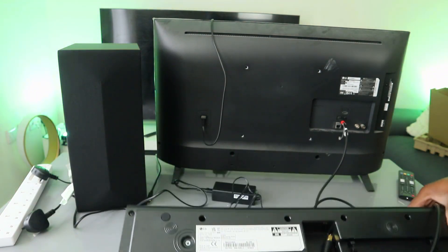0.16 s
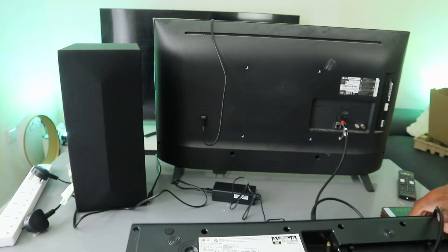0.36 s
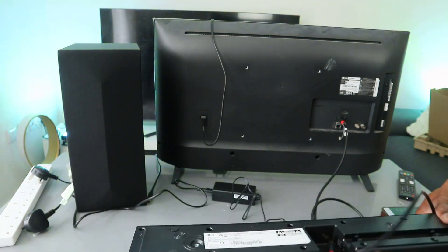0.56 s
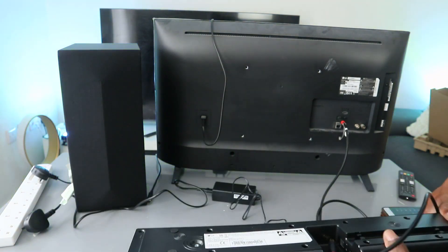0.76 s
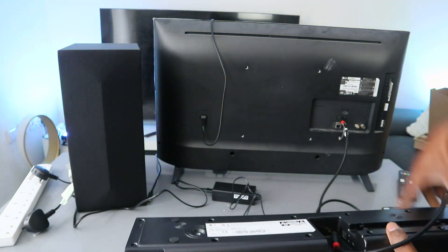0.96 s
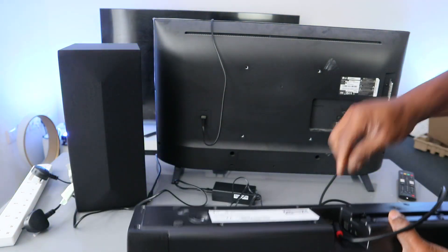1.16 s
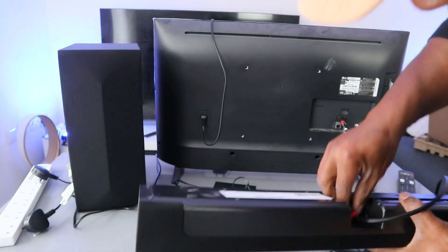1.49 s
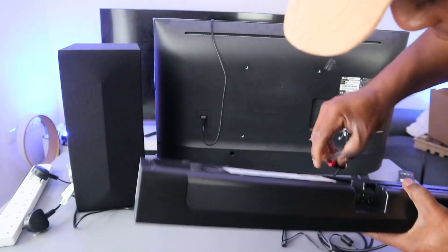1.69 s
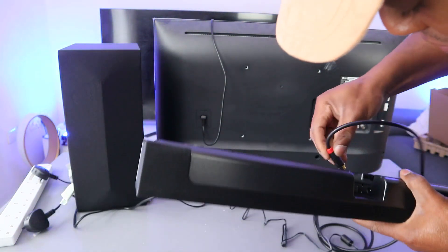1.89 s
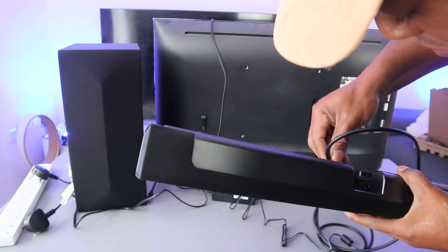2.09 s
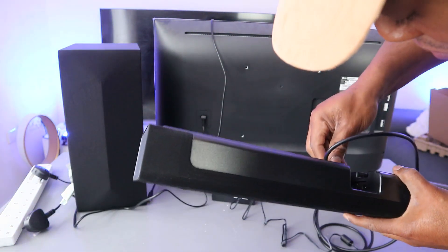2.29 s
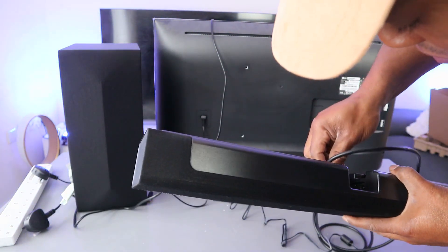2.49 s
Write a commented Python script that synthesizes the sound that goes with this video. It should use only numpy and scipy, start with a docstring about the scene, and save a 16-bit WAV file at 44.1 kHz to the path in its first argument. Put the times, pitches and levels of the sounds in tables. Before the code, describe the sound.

Plastic speaker housing knocks loudly on a desk, then clicks and scrapes as a plug is handled

```python
"""In a small room, a long plastic speaker housing is turned over on a desk while a plug is worked at its socket.
Knocks and clicks are shaped pulses, scrapes are runs of tiny slips; both excite the housing's resonances.
Each is heard as a direct snap, three echoes, panel rattle and a short room tail, with soft bumps beside them.
The first knock overloads the recorder, whose gain then creeps back up over a low hum and hiss, kept as
shaped noise."""
import sys
import numpy as np
from scipy import signal
from scipy.fft import rfft, irfft
from scipy.io import wavfile
from scipy.ndimage import uniform_filter1d

SR = 44100
rng = np.random.default_rng(int(sys.argv[2]) if len(sys.argv) > 2 else 0)


def output_pcm(signal):
    """Save a mono or channel-first signal as 16-bit PCM at the path in sys.argv[1].

    Samples are clipped to [-1, 1] before scaling.
    """
    pcm = np.clip(np.atleast_2d(signal).T, -1, 1) * 32767
    wavfile.write(sys.argv[1], SR, np.round(pcm).astype(np.int16))


N = 116865
TAIL = SR // 2   # length of every response, samples
HZ = np.maximum(np.arange(TAIL // 2 + 1) * SR / TAIL, 1)


def from_db(db):
    """Decibels to gain."""
    return 10 ** (np.asarray(db) / 20)


def at_hz(points, hz, axis=1):
    """Read a table column on a log-frequency axis."""
    table = np.array(points)
    return np.interp(np.log(hz), np.log(table[:, 0]), table[:, axis])


def add(track, s, sound):
    """Mix a sound in at a time."""
    start = max(int(s * SR), 0)
    track[..., start:start + sound.shape[-1]] += sound[..., :N - start]


def die_away(t, t60_s):
    """Exponential decay that falls 60 dB in t60."""
    return np.exp(-np.log(1000) * t / t60_s)


def pulse(db):
    """The shortest causal pulse with a given spectrum: minimum phase, by folding the cepstrum."""
    cepstrum = irfft(np.log(from_db(db)), TAIL)
    cepstrum[1:TAIL // 2] *= 2
    cepstrum[TAIL // 2 + 1:] = 0
    return irfft(np.exp(rfft(cepstrum)), TAIL)


# contacts with the housing, and a strong wall return some 25 ms after a hard knock (0.031, 1.633): [t/s, #
# relative level/dB, then colour on top of it: thud/dB, hollow/dB, crack/dB, tick/dB]
KNOCKS = [(.0035, 9.5, -5.5, 4.5, 5.5, -2.5), (.005, 15.5, -5, -7, 4.5, 0.5), (.0085, -1, 13, 5, -8, -14),
          (0.031, 10, -12, -8.5, -4, -14), (.046, 2.5, -7, -2, -10, -16), (.105, -7.5, -16, 2, -14, -20),
          (0.238, -14.5, 1, -6, 3.5, -26), (0.3708, -15, 2.5, -11, -6, -4), (.411, -20, 4.5, 1, 10.5, 9.5),
          (.428, -23.5, 9.5, 8, 8, 6), (0.499, -22.5, 11, 8.5, 6.5, -12), (0.5726, -19.5, 5.5, 0.5, -2, -9),
          (0.595, -24, 7, 3.5, 2, -5), (0.613, -22.5, -3, 1, 8, -2), (0.6317, -10, -3.5, -6.5, -5, 6.5),
          (0.6337, -3, 0, 0, -5.5, -7), (0.713, -25.5, 9.5, -8, 7, -4), (0.8244, -15.5, 3.5, -1, -0.5, -6),
          (.909, -28, 8, 1, 4, 3), (1.1042, -44, 16.5, 11.5, -0.5, 11), (1.1799, -42.5, 13, 10, 4, 1),
          (1.345, -22.5, 4, -1, 6.5, 3.5), (1.388, -5.5, -3.5, -9, 11, -4.5), (1.4423, -18, -2, -0.5, 7, 5),
          (1.469, -28, 10.5, 12.5, 11, -2), (1.4852, -12.5, 1.5, -6, 0.5, -3.5),
          (1.4957, -17.5, 5, 3, 3.5, -3), (1.61, -8.5, -3, -3, -4, -12), (1.633, -23.5, 9.5, 2, -18, -9),
          (2.044, -32, 6, 13, -2, -6), (2.071, -33.5, 6, 7, 8, -1), (2.5981, -39, -8, -5, 21.5, 20.5),
          (2.609, -18, 2, 2, 10, -3)]
# centres of thud, hollow, a neutral point, crack and tick: [f/Hz]
COLOUR_HZ = (450, 850, 2100, 3100, 9000)
# panel modes favoured by the spot where a knock lands: [t of the knock/s, f/Hz, lift/dB]
FAVOURED = [(.004, 1003, 7.5), (.004, 1533, 10.5), (.634, 2210, 7), (.824, 2050, 2), (1.388, 1985, 6.5),
            (1.388, 833, 10.5), (1.4415, 3480, 9), (1.485, 764, 13.5), (1.485, 2490, 11.5),
            (1.61, 683, 11.5), (1.61, 1700, 7), (1.61, 2190, 5), (1.61, 3330, 9), (2.609, 690, 10)]
FAVOURED_WIDTH = 0.068   # share of the mode's frequency
SAME_KNOCK_S = .005      # a favoured mode joins any knock this close in time


def knock(s, level_db, thud_db, hollow_db, crack_db, tick_db):
    """One contact: a short pulse coloured by how and where it lands, with any panel modes it favours."""
    bands_db = [thud_db, hollow_db, 0, crack_db, tick_db]
    colour = np.interp(np.log(HZ), np.log(COLOUR_HZ), bands_db)
    modes = 0
    for at, hz, lift_db in FAVOURED:
        if abs(at - s) < SAME_KNOCK_S:
            modes = modes + lift_db / (1 + (2 * (HZ / hz - 1) / FAVOURED_WIDTH) ** 2)
    return pulse(level_db + colour + modes + shell())


# slides of the shell, cable and fingers: [t/s, length/s, relative level/dB, squeak f/Hz, squeak lift/dB]
SCRAPES = [(0.274, 0.101, -37.5, 8000, 12.5), (0.361, 0.056, -28, 1680, 6), (0.456, 0.033, -31, 1940, 15),
           (0.688, 0.11, -42.5, 6000, 13), (0.869, 0.041, -37.5, 550, 1), (2.06, 0.034, -43.5, 940, 11.5),
           (2.548, 0.039, -42, 800, 14)]
SLIPS_PER_S, SLIP_SPREAD_DB = 650, 4.5
SQUEAK_OCTAVES, SCRAPE_EDGE_S = 0.45, 0.0095   # squeak breadth; fade at either end


def scrape(length_s, level_db, squeak_hz, squeak_db):
    """Stick and slip: a run of small uneven slips with one favoured pitch."""
    t = np.arange(int(length_s * SR)) / SR
    chance = rng.random(TAIL)[:len(t)]
    size = rng.standard_normal((2, TAIL))[:, :len(t)]
    slips = (chance < SLIPS_PER_S / SR) * np.sign(size[0]) * from_db(SLIP_SPREAD_DB * size[1])
    slips *= np.clip(np.minimum(t, length_s - t) / SCRAPE_EDGE_S, 0, 1)
    squeak = squeak_db * np.exp(-(np.log2(HZ / squeak_hz) / SQUEAK_OCTAVES) ** 2)
    return signal.fftconvolve(slips, pulse(level_db + squeak + shell())) / 2


# broad colour of an ordinary contact: [f/Hz, level/dB]
CONTACT = [(60, -37.5), (200, -17), (300, -11.5), (430, -2.5), (800, -1.5), (1200, 0.5), (2300, -2),
           (2850, -10.5), (3500, -15), (4200, -20.5), (6500, -28), (10000, -32.5), (13500, -43)]
# resonances of the housing: [f/Hz, lift before spread/dB, width/Hz]
SHELL = [(355, 5, 99), (450.2, 7, 41), (518, 10, 80), (575, 8.5, 37), (725, 8.5, 63), (847, 8, 127),
         (1029, 5.5, 18.4), (1417, 3.5, 64), (1606, 5.5, 16), (1685, 3.5, 290), (2115, 3.5, 120)]
MODE_SPREAD_DB = 1.5


def shell():
    """Colour of a contact in dB; each contact favours the housing's resonances a little differently."""
    hz, lift_db, width = np.transpose(SHELL)
    lifts = lift_db + MODE_SPREAD_DB * rng.standard_normal(len(hz))
    peaks = 1 / (1 + (2 * (HZ[:, None] - hz) / width) ** 2)
    return at_hz(CONTACT, HZ) + peaks @ lifts


# soft bumps of hand and cable: [t/s, level before the envelope/dB, f/Hz, t60/s]
BUMPS = [(0.378, -39, 168, 0.14), (1.681, -44, 225.8, 0.31)]
BUMP_RISE_S = 0.013


def soft_handling():
    """Dull bumps: low sines that swell briefly and die away."""
    t, out = np.arange(TAIL) / SR, np.zeros(N)
    for s, db, hz, t60 in BUMPS:
        swell = (1 - np.exp(-t / BUMP_RISE_S)) * die_away(t, t60)
        add(out, s, from_db(db) * swell * np.sin(2 * np.pi * hz * t))
    return out


RATTLE_T60_S, RATTLE_GRAIN_DB = 0.079, 6   # decay; unevenness of the reflections


def rattle():
    """Waves bouncing inside the panels: a quickly dying spray of uneven reflections, unit energy."""
    size = rng.standard_normal((2, TAIL))
    grains = np.sign(size[0]) * from_db(RATTLE_GRAIN_DB * size[1])
    spray = grains * die_away(np.arange(TAIL) / SR, RATTLE_T60_S)
    return spray / np.sqrt(np.sum(spray ** 2))


# how long the room rings: [f/Hz, t60/s]
ROOM_T60 = [(600, 0.33), (1800, 0.27), (4000, 0.32), (10000, 0.2)]
ROOM_ONSET_S = 0.0069


def room_tail():
    """Crowded room resonances: half-octave noise bands, each dying at its own rate; flat spectrum overall."""
    t, out = np.arange(TAIL) / SR, 0
    edges = 60 * 2 ** (np.arange(17) / 2)
    white = rfft(rng.standard_normal(TAIL))
    for low, high in zip(edges, edges[1:]):
        band = irfft(white * (HZ >= low) * (HZ < high), TAIL)
        t60 = at_hz(ROOM_T60, np.sqrt(low * high))
        band *= die_away(t, t60) * (1 - np.exp(-t / ROOM_ONSET_S))
        share = (high - low) / (SR / 2)   # energy in proportion to bandwidth
        out = out + band * np.sqrt(share / np.sum(band ** 2))
    return out


RATTLE_DB, ROOM_DB = 16, 13   # balance against the direct snap
DULL_HZ = 6000                # reflections lose their treble above this


def diffuse():
    """Panel rattle and the room's tail together, both duller than the direct snap."""
    tail = from_db(RATTLE_DB) * rattle() + from_db(ROOM_DB) * room_tail()
    r = np.exp(-2 * np.pi * DULL_HZ / SR)
    return signal.lfilter([1 - r], [1, -r], tail)


HOUSING_DB, EVEN_OVER_HZ = 21, 220   # loudness of the response; breadth of the levelling


def evened(response):
    """Level a response's broad colour, which the contact supplies, and keep its fine resonances."""
    width = max(int(EVEN_OVER_HZ * TAIL / SR), 1)
    power = uniform_filter1d(np.abs(rfft(response)) ** 2, width)
    leveller = pulse(HOUSING_DB - 10 * np.log10(power + 1e-18))
    return signal.fftconvolve(response, leveller)[:TAIL]


# desk, screen and wall: [nominal delay t/s, strength against the snap, treble edge f/Hz]
ECHOES = [(.0029, 1, 9000), (.0066, 0.32, 4000), (0.0248, 0.18, 1800)]


def path(scatter, snap_db):
    """From one spot to the microphone: the direct snap, duller echoes and the diffuse tail."""
    response = scatter.copy()
    response[0] += from_db(snap_db)
    for delay_s, strength, edge_hz in ECHOES:
        r = np.exp(-2 * np.pi * edge_hz / SR)
        smear = (1 - r) * r ** np.arange(64)
        varied_s = delay_s * (1 + .1 * rng.uniform(-1, 1))
        add(response, varied_s, strength * from_db(snap_db) * smear)
    return evened(response)


# stereo spread of the handling: [f/Hz, side minus mid level/dB]
WIDTH = [(100, -15), (500, -29), (1200, -15.5), (2500, -17.5), (4500, -1), (8000, 0.5), (12000, 4.5)]


def spread(sideways):
    """Set how wide the handling sounds at each frequency."""
    return signal.fftconvolve(sideways, pulse(at_hz(WIDTH, HZ)))[:N]


# room hum and hiss: [f/Hz, relative mid level/dB, relative side level/dB]
FLOOR = [(25, -15, -23), (69.9, -2, -28), (93, -1.5, -17), (125, -5, -9), (493.4, -8, -8),
         (940, -10.5, -10), (2120, -19.5, -14.5), (4920, -26, -21), (8980, -34.5, -30),
         (12700, -45.5, -35.5)]
FLOOR_DB = -32.5   # shifts both columns


def floor():
    """Steady hum and hiss: white noise shaped by frequency, as mid and side."""
    hz = np.maximum(np.arange(N // 2 + 1) * SR / N, 1)
    gains = from_db([FLOOR_DB + at_hz(FLOOR, hz, axis=1), FLOOR_DB + at_hz(FLOOR, hz, axis=2)])
    return irfft(rfft(rng.standard_normal((2, N))) * gains, N)


SNAP_DB, SNAP_PER_DB = 13.5, 0.09   # direct sound; a louder contact is snappier


def scene():
    """Knocks and scrapes on the housing, heard through the room, with soft bumps, over the floor."""
    handling, background, soft = np.zeros((2, N)), floor(), soft_handling()
    spots = [(diffuse(), evened(diffuse())) for _ in range(14)]
    sounds = [(s, db, knock(s, db, *colour)) for s, db, *colour in KNOCKS]
    sounds += [(s, db, scrape(length, db, *squeak)) for s, length, db, *squeak in SCRAPES]
    for k, (s, db, sound) in enumerate(sounds):
        scatter, sideways = spots[k % len(spots)]   # contacts take the spots in turn
        responses = [path(scatter, SNAP_DB + SNAP_PER_DB * db), sideways]
        add(handling, s, signal.fftconvolve(responses, sound[None], axes=1))
    mid = handling[0] + soft + background[0]
    side = spread(handling[1]) + background[1]
    return np.array([mid + side, mid - side])


LIMIT_DB, DETECTOR_S = -10, 0.0083    # gain drops above this level; averaging time
ATTACK_S, RELEASE_S = 0.0051, 0.54    # time constants
CUTOFF_HZ = 14000


def record(dry):
    """Gain control with a slow release, soft overload, and the top cut off."""
    power = uniform_filter1d(np.mean(dry ** 2, axis=0), max(int(DETECTOR_S * SR), 1))
    over = np.maximum(10 * np.log10(np.abs(power) + 1e-18) - LIMIT_DB, 0)
    release = np.exp(-np.arange(N) / SR / RELEASE_S)
    held_db = np.maximum.accumulate(over / release) * release   # each peak holds, then decays
    r = np.exp(-1 / (ATTACK_S * SR))
    cut_db = signal.lfilter([1 - r], [1, -r], held_db)
    loud = np.tanh(dry * from_db(-cut_db))
    return signal.sosfilt(signal.cheby2(12, 50, CUTOFF_HZ, fs=SR, output="sos"), loud)


dry = scene()
out = record(dry)
output_pcm(out)
```